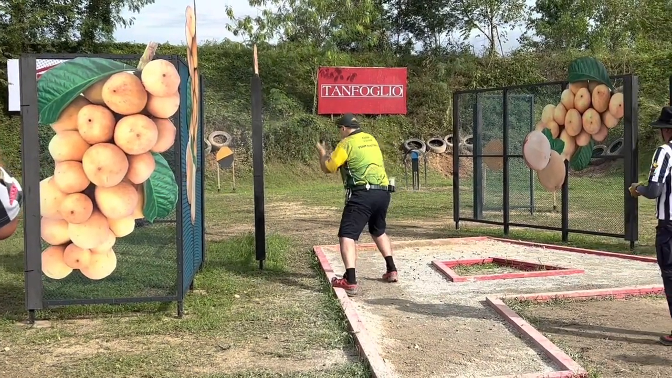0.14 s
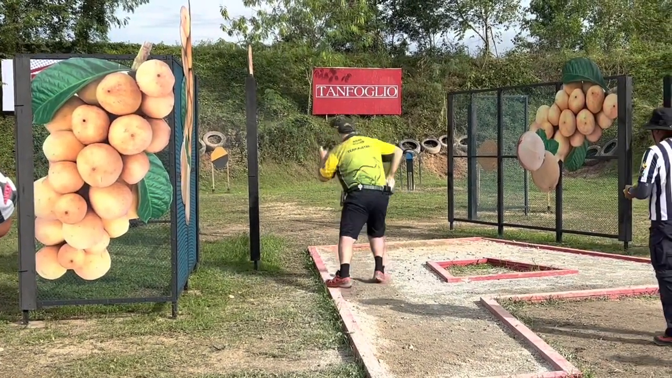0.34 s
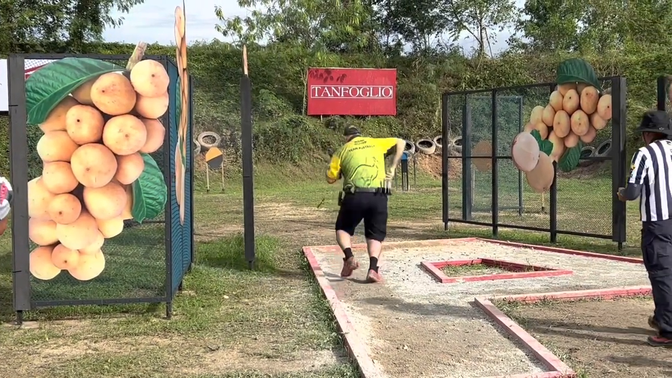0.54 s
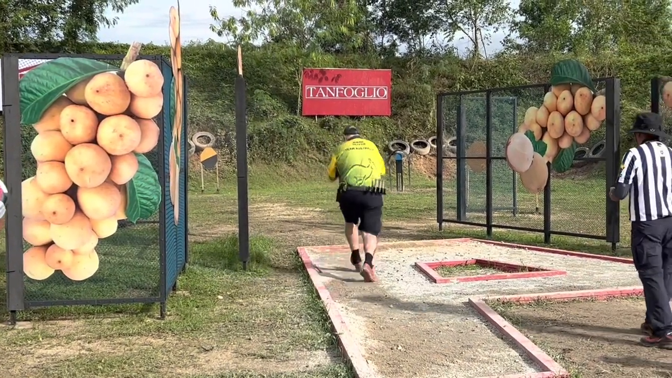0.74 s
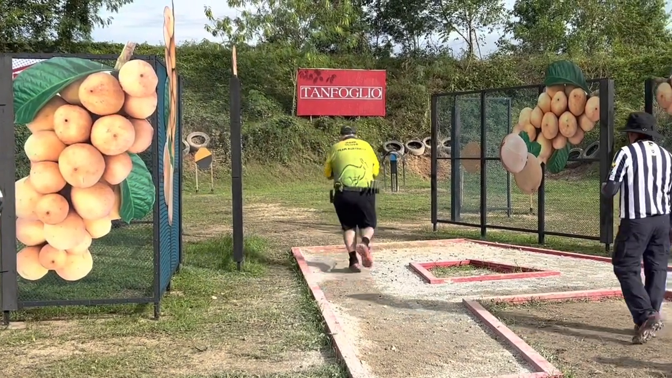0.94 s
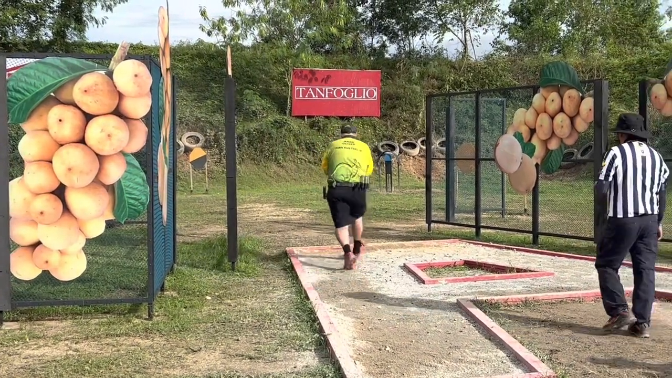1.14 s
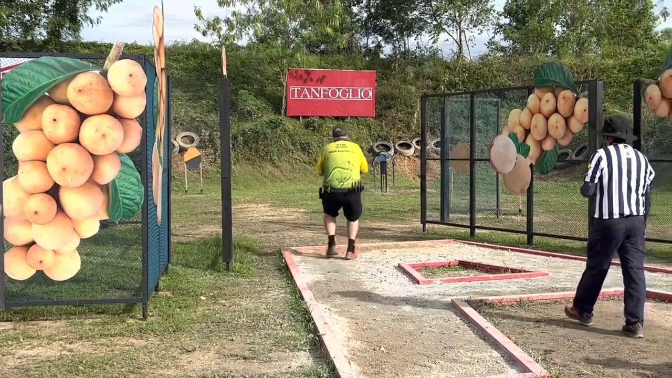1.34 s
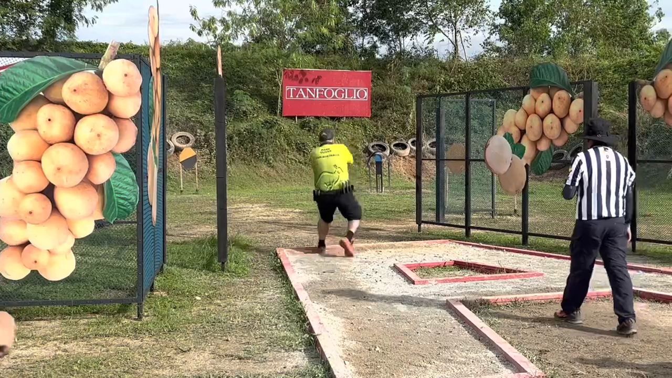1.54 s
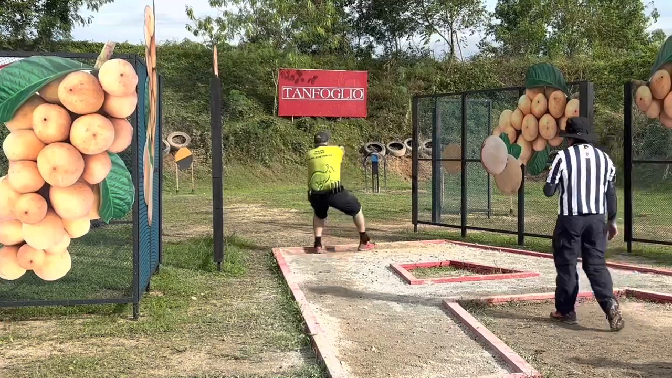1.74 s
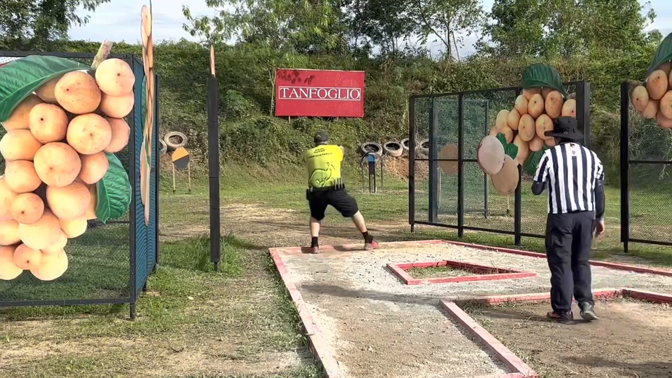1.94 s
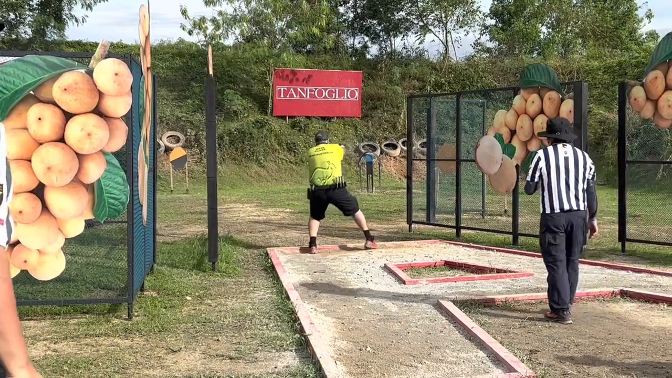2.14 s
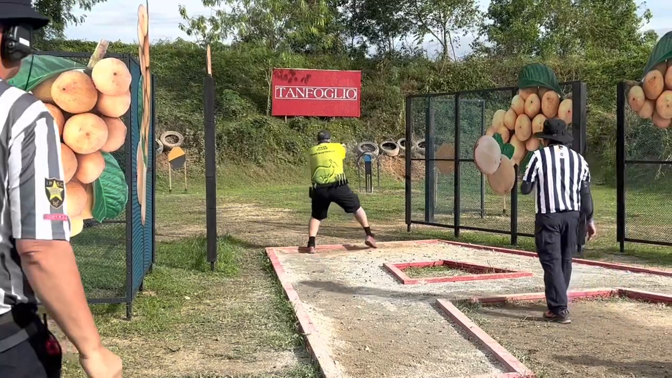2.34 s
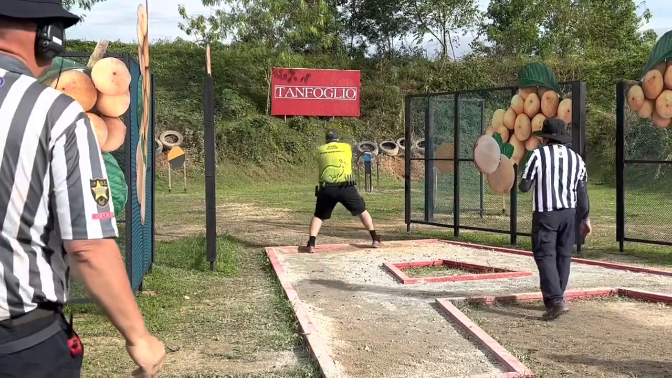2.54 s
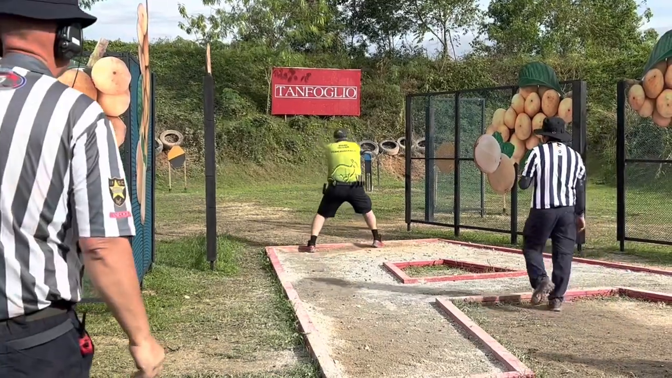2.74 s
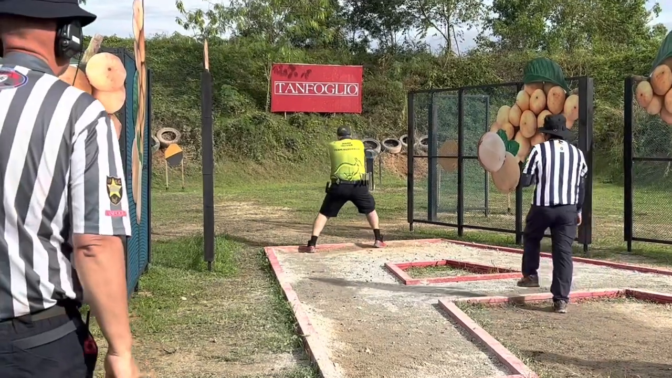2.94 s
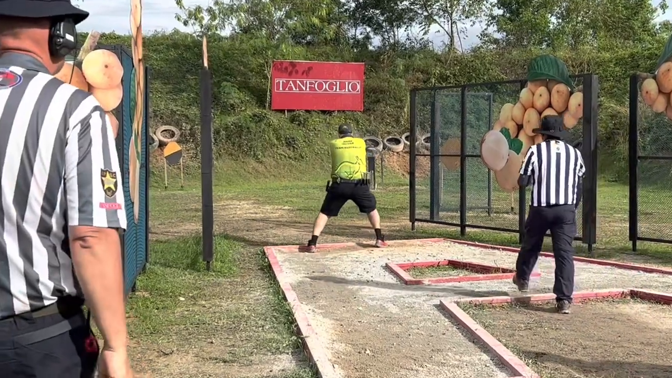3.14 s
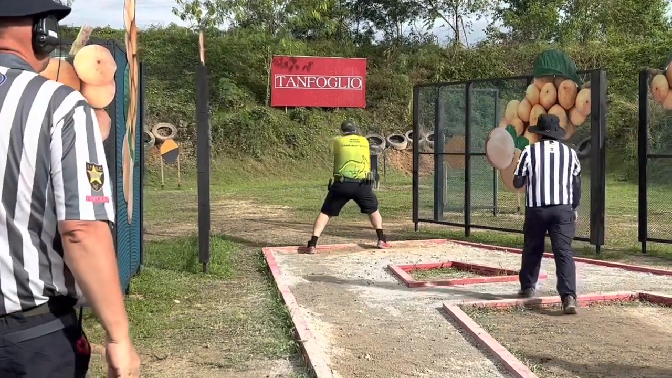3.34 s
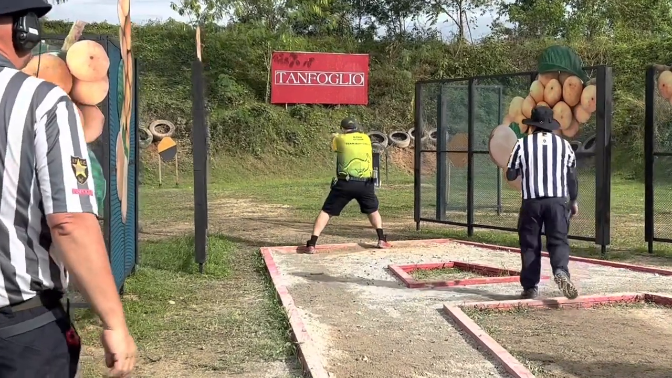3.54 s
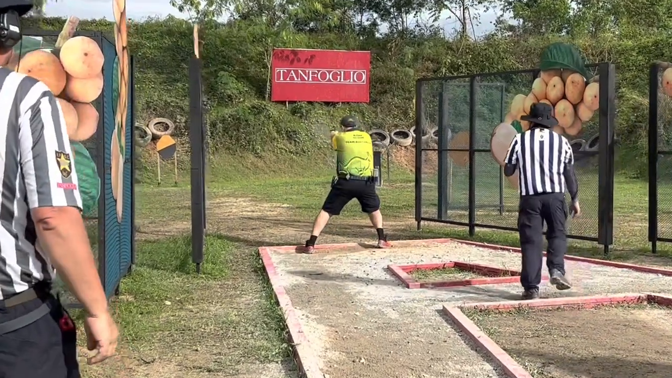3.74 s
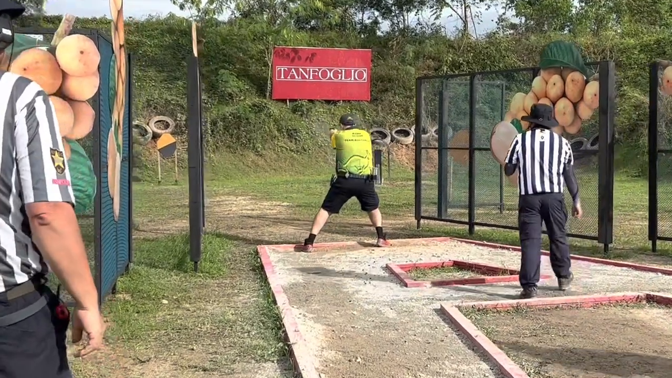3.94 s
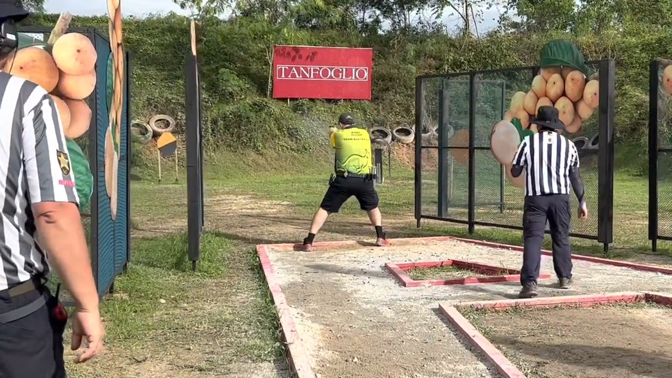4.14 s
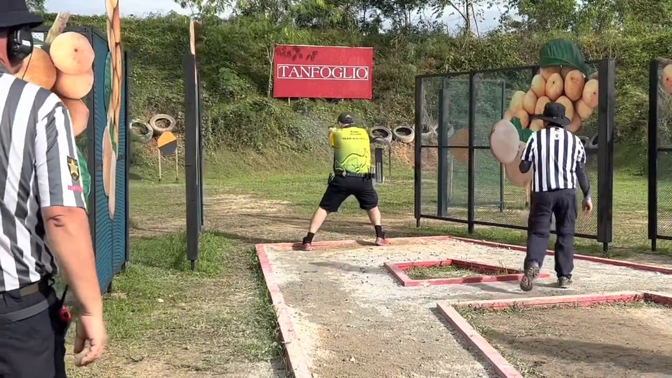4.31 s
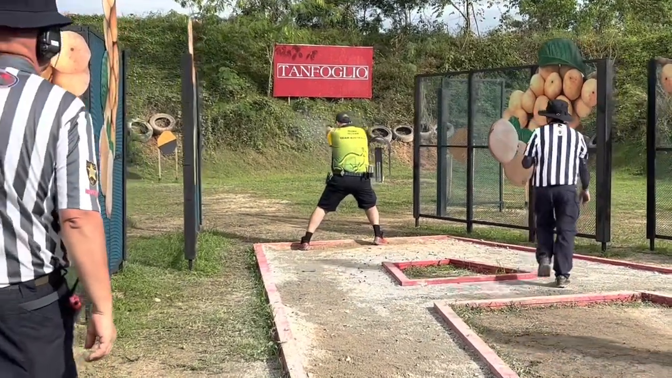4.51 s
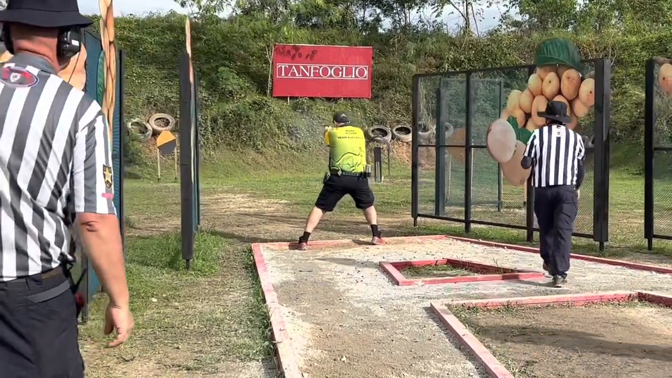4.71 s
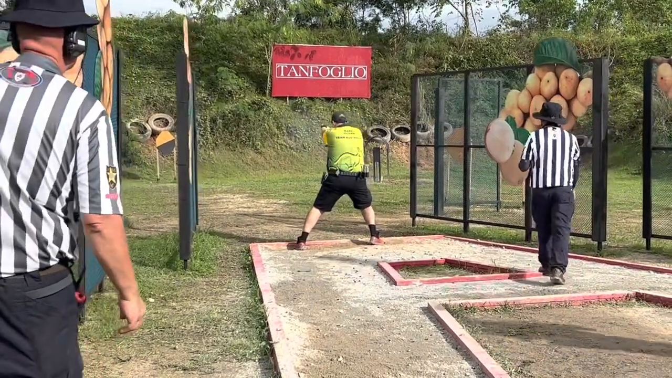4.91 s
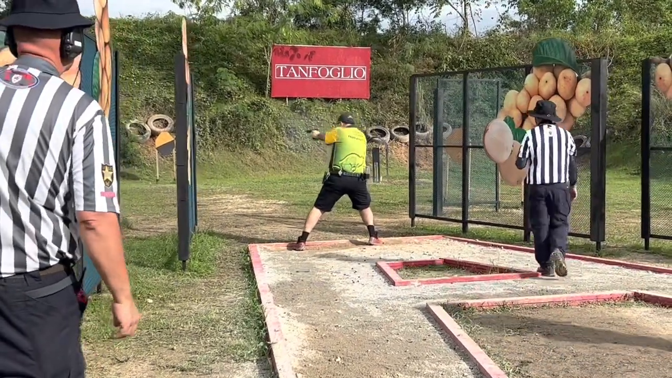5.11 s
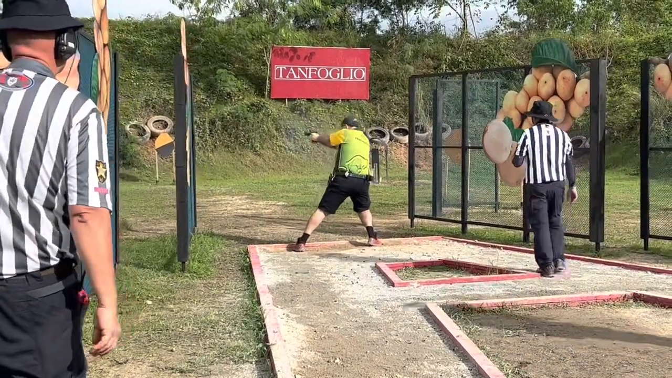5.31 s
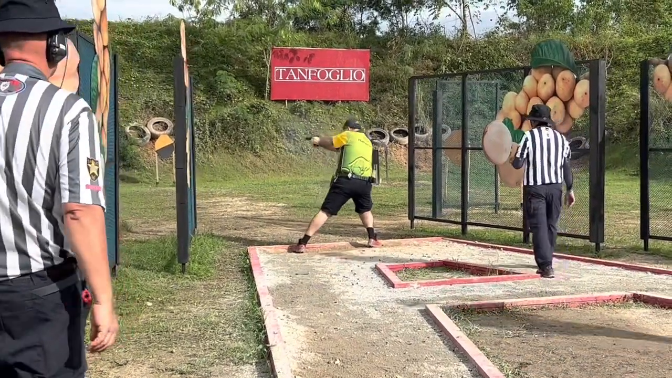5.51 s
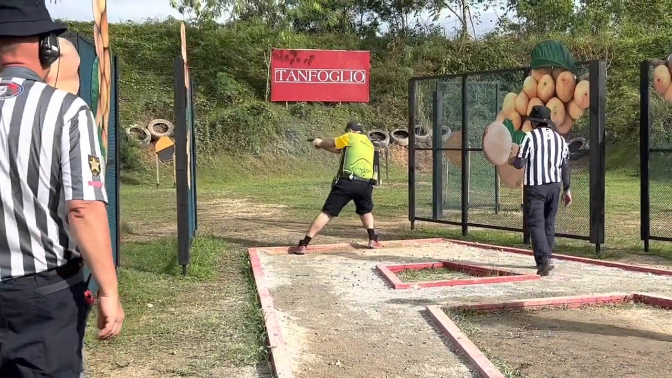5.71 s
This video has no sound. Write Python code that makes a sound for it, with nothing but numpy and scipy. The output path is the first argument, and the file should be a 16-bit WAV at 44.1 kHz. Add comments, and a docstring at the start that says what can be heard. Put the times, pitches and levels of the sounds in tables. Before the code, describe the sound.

Quiet outdoor air with a low, soft breeze; the far echo of an earlier shot fades during the first half second. From 0.2 to 2 s faint gravel crunches mark a running shooter, with a clear gear click at 0.76 s, smaller metallic clicks around 1.05 s, and duller footfalls and scuffs from 1.1 to 1.9 s. Then a pistol fires about ten metres away: a quick pair at 2.03 and 2.31 s, then single shots at 2.93, 3.66, 4.11, 4.54 and 5.60 s. Each is an abrupt, very loud crack with rapid slaps off ground, screen and bank, then a noisy wash from the trees and a dull roll fading within about half a second. Some carry a deep thump, strongest at the last. Tiny bullet strikes follow several shots by 30 to 80 milliseconds. At 3.0 s a bullet clanks on steel, ringing high and briefly; its low note faintly swells near 3.4 s.

```python
"""An outdoor bay with earth banks, where a pistol fires seven shots about ten metres from the microphones.
First a shooter runs over gravel: short noise bursts make crunches and footfalls, with clicking, ringing gear.
Each blast is a sharp front with a noisy wake; it slaps off the ground, screens and banks.
Noise that fades gives the trees' answer, and falling or wavering tones give the low thump and boom.
Bullets strike earth and targets; one rings a steel plate, built from fading tones, in the quiet outdoor air."""
import sys
import numpy as np
from scipy.fft import rfft, irfft, next_fast_len
from scipy.io import wavfile
from scipy.ndimage import map_coordinates

SR = 44100
rng = np.random.default_rng(int(sys.argv[2]) if len(sys.argv) > 2 else 0)


def wav_record(signal):
    """Record a signal, one row per channel, as 16-bit PCM in the file named by sys.argv[1]."""
    frames = np.transpose(np.atleast_2d(signal))
    bounded = np.clip(frames, -1, 1)
    # unit amplitude maps onto the largest positive 16-bit level
    quanta = np.round(bounded * 32767).astype(np.int16)
    wavfile.write(sys.argv[1], SR, quanta)


N = 258822
AGE = np.arange(SR) / SR  # seconds since one sound began
CLOCK = np.arange(N) / SR  # seconds since the scene began

# outdoor air: pitch_hz, level_db (per Hz, relative)
AIR_SPECTRUM = [(15, -54.5), (25, -21), (48, 1.5), (97, -1.5), (206, -10), (256, -14.5), (489, -17.5),
                (695, -19.5), (775, -20), (3340, -29.5), (6380, -35.5), (16000, -49)]
# two distant tree lines that echo: delay_s, level_db (relative), rise_s, fade_s (for 60 dB)
TREE_LINES = [(0.289, -0.5, 0.098, 0.96), (0.443, .5, 0.075, .55)]
# gear clicks: start_s, level_db, fade_s (for 60 dB), ring_db (ringing compared with rattle)
GEAR_CLICKS = [(.755, -39, 0.053, -19), (.772, -57, .11, 2.5), (.857, -63, 0.035, -10),
               (1.039, -57.5, 0.044, 3), (1.088, -47.5, .05, -9), (1.103, -54, 0.12, -17),
               (1.944, -61, 0.06, -30)]
# the gear's rattle: pitch_hz, level_db (per Hz, relative)
RATTLE_SPECTRUM = [(100, -6), (700, -8.5), (1900, -6), (3100, -3), (5000, -7.5), (7200, 4), (9500, -7.5),
                   (12000, -1.5), (16000, -13.5)]
# the gear's ringing tones: pitch_hz, level_db (relative, before a random change)
BUCKLE_TONES = [(2180, -4), (2340, 1), (2560, -4.5), (2950, -6), (3900, -5)]
# footfalls and scuffs: start_s, level_db (relative), bend_hz (treble falls above it), fade_s (for 60 dB)
FOOTFALLS = [(1.09, -61.5, 2400, 0.5), (1.284, -66, 1500, .09), (1.401, -63.5, 1980, .15),
             (1.44, -63.5, 1800, 0.21), (1.552, -55.5, 898, 0.18), (1.621, -62.5, 900, 0.19),
             (1.705, -55, 1080, 0.2), (1.739, -58, 1194, .1), (1.885, -60, 396.7, 0.59)]
# shots: start_s, blast_db, treble_db, thump_db, boom_db, screen_delay_s, screen_db, bank_db, far_db
# (all levels are relative)
SHOTS = [(2.0343, -0.5, 1.5, -11, 1, 0.019, -5.5, -15.5, -45),
         (2.3065, -1, 2.5, -17, -13, .0184, -2.5, -14, -52.5),
         (2.9310, -1.5, 0.5, -31, -28, 0.02, -3, -13.5, -57),
         (3.6558, -.5, 2, -3, -5, 0.018, -3.5, -6.5, -59),
         (4.1125, -1.5, 2, -1, -4, .0175, -2.5, -7.5, -59),
         (4.5355, .5, 2, -14, -19, .0176, -2.5, -9.5, -60), (5.6022, 0, -1.5, 3, -.5, 0.019, 2, -6, -59)]
# the muzzle blast: pitch_hz, level_db (per Hz, relative)
BLAST_SPECTRUM = [(40, -23), (150, -10), (300, -5), (520, -7.5), (750, -3), (1100, 0.5), (1300, -2.5),
                  (1550, -12), (2300, -9.5), (4300, -12), (5500, -18), (8000, -17.5), (12000, -19.5),
                  (16000, -31.5)]
# the trees' answer: pitch_hz, level_db (per Hz, relative)
SCATTER_SPECTRUM = [(30, -8.5), (100, -2.5), (200, 3.5), (500, -4.5), (800, -3), (1500, -11), (3000, -5),
                    (5500, -12), (8000, -9), (10000, -19.5), (12000, -16.5), (16000, -31)]
# bullets striking earth and targets: start_s, level_db (relative), brightest_hz
IMPACTS = [(2.0658, -11.5, 5004), (2.3374, -14, 4960), (4.1895, -14, 6480), (4.6123, -13.5, 6004),
           (5.6408, -22, 6000)]
# the steel plate's tones: pitch_hz, level_db, fade_s (for 60 dB)
PLATE_TONES = [(1137, -49, 1.2), (2592, -41.5, .6), (2760, -46, 0.43), (3300, -48, .35), (4380, -43, .35),
               (4895, -23.5, .12), (4900, -43, 0.66), (6770, -36.5, 0.2), (8300, -25.5, 0.11),
               (8335, -23, 0.058), (8350, -47, 0.52), (8730, -24.5, 0.079), (8700, -39.5, 0.41)]
# phase between the two microphones: pitch_hz, left_lead_radians
MICROPHONE_PHASE = [(300, .1), (1300, 0), (1600, -.6), (2100, 0), (3000, .65), (4500, .4), (6500, 0),
                    (8400, .1), (10280, -3.14), (12000, -6.28), (13800, -9.42), (15300, -12.4)]

# more colours, each: pitch_hz, level_db (relative)
FAR_SPECTRUM = [(25, -9), (48, 2.5), (75, -6.5), (150, 2.0), (450, -4.5), (1150, 2.0),
                (1800, -7.5), (3200, -7), (8000, -19), (13000, -34.0)]
GROUND_COLOUR = [(200, 7.5), (900, 1.5), (2000, 1.5), (8000, -12.0)]
SCREEN_COLOUR = [(300, 0.5), (1100, 0.5), (3000, -0.5), (8000, -3)]
SOFT_EARTH_SPECTRUM = [(100, -24.0), (300, -5), (430, -2.0), (620, -5.0), (1200, -21.0), (4000, -41.5)]
FENCE_COLOUR = [(300, 2.0), (1200, 0.5), (3000, 1), (8000, -10.5)]
LONG_PATH_COLOUR = [(200, 0.0), (1200, 8), (4000, -6.5), (8000, -4.5), (12000, -26)]
ROLL_SPECTRUM = [(60, -23.5), (160, -5.5), (310, -1.0), (540, -2.0), (800, -7), (1500, -16), (5000, -46)]
CLANK_SPECTRUM = [(200, -21.0), (1000, -11.5), (2000, 4.0), (3100, -1.0), (4300, -14.5),
                  (8000, -18), (16000, -25.5)]

# outdoor air: middle level, slow drift and quick flicker of that level
AIR_DB, AIR_DRIFT_DB, AIR_FLICKER_DB = -67, .8, 1.0
# an earlier shot's far echo is still dying away at the start
EARLIER_SHOT_AGO_S, EARLIER_ECHO_DB = .38, -61
# gravel crunches: the range runs from the quietest to the loudest
RUN_START_S, RUN_END_S = .2, 2.0
CRUNCH_QUIETEST_DB, CRUNCH_RANGE_DB, CRUNCH_T60_S, CRUNCH_BEND_HZ = -65.75, 5, .07, 1300
# echoes from fences and posts, right behind the blast
FENCE_DB, FENCE_ATTACK_S, FENCE_HOLD_S, FENCE_SAG_DB_PER_S, FENCE_T60_S = -21.5, .003, .031, 70, .06
# the trees' answer
TREES_DB, TREES_ATTACK_S, TREES_HOLD_S, TREES_SAG_DB_PER_S, TREES_T60_S = -31, .0055, .089, 23.5, .36
# the banks' low roll
ROLL_DB, ROLL_ATTACK_S, ROLL_HOLD_S, ROLL_T60_S = -35, .044, .061, .16
# both linger in a long, weak tail (dB compared with their own start)
TREES_TAIL_DB, ROLL_TAIL_DB, TAIL_T60_S = -14.5, -7.5, 1.01
# the low thump, before each shot's own level: a short swell whose pitch falls to rest
THUMP_DB, THUMP_PEAK_S, THUMP_WIDTH_S = -12, .021, .015
THUMP_START_HZ, THUMP_REST_HZ, THUMP_FALL_S = 210, 49.3, .012
THUMP_ECHO_S, THUMP_ECHO_DB = .028, -20.5
# the bass boom, before each shot's own level: a slow swell on one wavering note
BOOM_DB, BOOM_HZ, BOOM_PEAK_S, BOOM_WIDTH_S = -32, 49.5, .155, .082
# the bullet on the plate, and a later swell of the plate's lowest note
PLATE_S = 2.9988
SWELL_S, SWELL_DB, SWELL_RISE_S, SWELL_T60_S = 3.42, -46, .16, .18
# soft overload ceiling (full scale is 1) and upper limit of the sound
OVERLOAD_LEVEL, TOP_HZ = .64, 15900


def amp(db):
    """Turn decibels into a multiplier."""
    return 10 ** (np.asarray(db) / 20)


def unit(x):
    """Scale to an average strength (rms) of 1."""
    return x / np.sqrt(np.mean(x ** 2) + 1e-20)


def add(track, s, x):
    """Mix x into the track at time s, which may lie before the start."""
    start = round(s * SR)
    x = x[..., max(-start, 0):]
    part = track[..., max(start, 0):][..., :x.shape[-1]]
    part += x[..., :part.shape[-1]]


def colour(x, points):
    """Filter by (Hz, dB) points without any sound before its cause (minimum phase)."""
    n = x.shape[-1]
    m = 2 * next_fast_len(n // 2 + 4096)
    hz, db = np.transpose(points)
    gain_db = np.interp(np.log(np.fft.rfftfreq(m, 1 / SR) + 1), np.log(hz), db)
    # folding the cepstrum forward in time gives the matching phase
    cepstrum = irfft(np.log(amp(gain_db)))
    cepstrum[1:m // 2] *= 2
    cepstrum[m // 2 + 1:] = 0
    return irfft(rfft(x, m) * np.exp(rfft(cepstrum)), m)[..., :n]


def wobble(rate, size=SR):
    """A smooth random curve through `rate` random points a second."""
    points = rng.standard_normal(int(size * rate / SR) + 4)
    return map_coordinates(points, [np.arange(size) * rate / SR])


def wash(spectrum, side_db, size=SR):
    """Coloured stereo noise of rms 1; side_db sets how much the two ears differ."""
    mid, side = colour(rng.standard_normal((2, size)), spectrum)
    side = amp(side_db) * side
    return unit(np.array([mid + side, mid - side]))


def hump(hz, below_db, above_db):
    """A broad colour around hz, with its levels two octaves below and above."""
    return [(hz / 16, 2 * below_db), (hz / 4, below_db), (hz, 0), (hz * 4, above_db)]


def envelope(attack_s, hold_s, t60, sag_db_per_s=0):
    """A rise, a hold that may sag, then an even decay."""
    held = np.clip(AGE - attack_s, 0, hold_s)
    released = np.maximum(AGE - attack_s - hold_s, 0)
    rise = np.minimum(AGE / attack_s, 1) ** 2
    return rise * amp(-sag_db_per_s * held - 60 * released / t60)


def with_tail(shape, tail_db):
    """Add a long, weak decay under an envelope."""
    tail = amp(tail_db - 60 * AGE / TAIL_T60_S) * np.maximum.accumulate(shape)
    return np.hypot(shape, tail)


def swell(peak_s, width_s):
    """A rounded rise and fall that reaches 1 at peak_s."""
    return np.exp(-((AGE - peak_s) / width_s) ** 2)


def crest(t, rise_s, t60):
    """Grow by 20 dB in rise_s up to t = 0, then decay."""
    return amp(np.minimum(20 * t / rise_s, -60 * t / t60))


def tap(sound, t60, rise_s):
    """A gritty contact that fades fast, with a faint, slower answer from the bay."""
    contact = amp(-60 * AGE / t60)
    answer = amp(-26.0 - 60 * AGE / 1.1)
    rise = 1 - np.exp(-AGE / rise_s)
    grit = unit(amp(3 * wobble(300)))
    return grit * (contact + answer) * rise * sound


def breeze():
    """Quiet outdoor air: noise whose level drifts slowly and flickers quickly."""
    drift_db = AIR_DRIFT_DB * wobble(1.1, size=N)
    flicker_db = AIR_FLICKER_DB * wobble(29, size=N)
    return amp(AIR_DB + drift_db + flicker_db) * wash(AIR_SPECTRUM, side_db=-12, size=N)


def far_echo():
    """Two distant tree lines answer: noise that swells to two crests within half a second."""
    power = sum((amp(db) * crest(AGE - delay_s, rise_s, t60)) ** 2
                for delay_s, db, rise_s, t60 in TREE_LINES)
    return np.sqrt(power) * amp(1.5 * wobble(40)) * wash(FAR_SPECTRUM, side_db=-7.5)


def earlier_shot():
    """The dying far echo of a shot fired before the start."""
    out = np.zeros((2, N))
    add(out, -EARLIER_SHOT_AGO_S, amp(EARLIER_ECHO_DB) * far_echo())
    return out


def crunches(count):
    """Loose gravel shifts in short noise bursts at uneven intervals under the running shooter."""
    out = np.zeros((2, N))
    spectrum = hump(CRUNCH_BEND_HZ, below_db=0, above_db=-20.5) + [(16000, -41)]
    for k, (late, size) in enumerate(rng.random((count, 2))):
        gravel = tap(wash(spectrum, side_db=-9), CRUNCH_T60_S, rise_s=.002)
        s = RUN_START_S + (k + late) / count * (RUN_END_S - RUN_START_S)
        add(out, s, amp(CRUNCH_QUIETEST_DB + CRUNCH_RANGE_DB * size) * gravel)
    return out


def gear():
    """The shooter's gear clicks: a noisy rattle mixed with wavering metal tones."""
    out = np.zeros((2, N))
    for s, db, t60, ring_db in GEAR_CLICKS:
        ring = np.zeros(SR)
        for hz, level_db in BUCKLE_TONES:
            tone = np.sin(2 * np.pi * hz * AGE + wobble(150))
            ring += amp(level_db + rng.normal(0, 3.9)) * tone
        click = wash(RATTLE_SPECTRUM, side_db=-18.5) + amp(ring_db) * unit(ring)
        add(out, s, amp(db) * tap(click, t60, rise_s=.00088))
    return out


def footfalls():
    """Shoes land and scuff on gravel: gritty noise with a softer start than the clicks."""
    out = np.zeros((2, N))
    for s, db, hz, t60 in FOOTFALLS:
        gravel = wash(hump(hz, below_db=2.0, above_db=-17) + [(16000, -33)], side_db=-9.5)
        add(out, s, amp(db + 4.0) * tap(gravel, t60, rise_s=.013))
    return out


def crack(spectrum, spread_s, ragged, side_db=-11):
    """A pressure front with a ragged wake that differs at each microphone."""
    u = AGE / spread_s
    wake = rng.standard_normal((2, SR)) * u * np.exp(-u ** 2 / 4)
    mid = ragged * unit(wake[0])
    side = ragged * amp(side_db) * unit(wake[1])
    add(mid, spread_s, np.array([np.sqrt(SR)]))  # the front is a single spike
    # as strong as one millisecond at rms 1
    return unit(colour(np.array([mid + side, mid - side]), spectrum)) / np.sqrt(1000)


def wall_slap(direct):
    """An uneven wall mirrors part of the wave and scrambles the rest."""
    scrambled = crack(BLAST_SPECTRUM, spread_s=.00071, ragged=3.0, side_db=-15.0)
    return amp(-3) * direct + amp(-5.5) * scrambled


def bank_slap():
    """The earth bank returns a crack, and its soft earth a low note a moment later."""
    bank = crack(hump(3200, below_db=-2, above_db=-16), spread_s=.00091, ragged=4.5)
    earth = crack(SOFT_EARTH_SPECTRUM, spread_s=.00072, ragged=.58)
    add(bank, .0018, amp(2.5) * earth)
    return bank


def blast(screen_s, screen_db, bank_db):
    """The muzzle blast, its slaps off ground, screen and bank, and echoes from fences and posts."""
    direct = crack(BLAST_SPECTRUM, spread_s=.0007, ragged=1.9, side_db=-17)
    ground = colour(wall_slap(direct), GROUND_COLOUR)
    screen = colour(wall_slap(direct), SCREEN_COLOUR)
    fence_shape = envelope(FENCE_ATTACK_S, FENCE_HOLD_S, FENCE_T60_S, FENCE_SAG_DB_PER_S)
    fence_noise = colour(wash(BLAST_SPECTRUM, side_db=-11.0), FENCE_COLOUR)
    out = direct + amp(FENCE_DB + 2 * wobble(500)) * fence_shape * fence_noise
    add(out, .0058, amp(-4.5) * ground)
    add(out, screen_s, amp(screen_db) * screen)
    add(out, .0538, amp(bank_db - 6.0) * bank_slap())
    return out


def thump(thump_db, boom_db):
    """The jolted microphones: a short push, a heave falling in pitch with one echo, then the bay's boom."""
    push = np.cos(2 * np.pi * 205 * (AGE - .009)) * swell(peak_s=.007, width_s=.004)
    push_gain = amp(-14.0 + 0.11 * thump_db)  # the push grows much less than the heave
    hz = THUMP_REST_HZ + (THUMP_START_HZ - THUMP_REST_HZ) * np.exp(-(AGE / THUMP_FALL_S) ** 2)
    heave_tone = np.sin(2 * np.pi * np.cumsum(hz) / SR + 3.2)
    heave = amp(THUMP_DB) * swell(THUMP_PEAK_S, THUMP_WIDTH_S) * heave_tone
    add(heave, THUMP_ECHO_S, amp(THUMP_ECHO_DB) * heave)
    boom_tone = np.sin(2 * np.pi * BOOM_HZ * AGE + .45 * wobble(22))
    boom = amp(BOOM_DB) * swell(BOOM_PEAK_S, BOOM_WIDTH_S) * boom_tone
    low = push_gain * push + amp(thump_db) * heave + amp(boom_db) * boom
    return low * amp([[.5], [-.5]])  # slightly stronger on the left


def trees():
    """Countless small echoes from grass, banks and leaves; longer paths lose their treble."""
    early = wash(SCATTER_SPECTRUM, side_db=-16)
    late = colour(early, LONG_PATH_COLOUR)
    late_share = np.clip(AGE / 0.8, 0, 1) ** 2.5
    clumps_db = 1.8 * wobble(350) + 1.5 * wobble(60)
    shape = envelope(TREES_ATTACK_S, TREES_HOLD_S, TREES_T60_S, TREES_SAG_DB_PER_S)
    noise = early * (1 - late_share) + late * late_share
    return noise * amp(TREES_DB + clumps_db) * with_tail(shape, TREES_TAIL_DB)


def bank_roll():
    """The banks' low roll: dull, wide noise in uneven lumps."""
    lumps = unit(amp(4.5 * wobble(110)))
    shape = with_tail(envelope(ROLL_ATTACK_S, ROLL_HOLD_S, ROLL_T60_S), ROLL_TAIL_DB)
    return amp(ROLL_DB) * wash(ROLL_SPECTRUM, side_db=-3) * lumps * shape


def pistol():
    """Every shot with its thump and echoes, brighter or duller as the muzzle turns."""
    out = np.zeros((2, N))
    for s, blast_db, treble_db, thump_db, boom_db, screen_s, screen_db, bank_db, far_db in SHOTS:
        bang = colour(blast(screen_s, screen_db, bank_db), [(1200, 0), (2200, treble_db)])
        add(out, s, amp(blast_db - 3.0) * bang)
        add(out, s, thump(thump_db, boom_db))
        add(out, s, trees() + bank_roll() + amp(far_db) * far_echo())
    return out


def impacts():
    """Bullets strike earth and targets: small cracks, each with its own brightest pitch."""
    out = np.zeros((2, N))
    for s, db, hz in IMPACTS:
        strike = crack(hump(hz, below_db=-14.5, above_db=-15.5), spread_s=.00059, ragged=2.5)
        add(out, s, amp(db - 6.0) * strike)
    return out


def plate():
    """A bullet clanks on steel, with a splash of noise; the tones beat and waver as the plate tips."""
    out = np.zeros((2, N))
    clank = crack(CLANK_SPECTRUM, spread_s=.0003, ragged=.73)
    ring = np.zeros(SR)
    for hz, db, t60 in PLATE_TONES:
        level_db = db - 60 * AGE / t60 + 2.6 * wobble(25)
        ring += amp(level_db) * np.sin(2 * np.pi * hz * AGE + .4 * wobble(80))
    splash_noise = wash(hump(3500, below_db=-7, above_db=-13.0), side_db=-13.0)
    splash = amp(-36.5 - 60 * AGE / 0.33) * splash_noise
    add(out, PLATE_S, amp(-9.5) * clank + ring + splash)
    return out


def plate_swell():
    """The plate's lowest note swells once more and fades fast."""
    lowest_hz = PLATE_TONES[0][0]
    low_note = np.sin(2 * np.pi * lowest_hz * CLOCK + .3 * wobble(50, size=N))
    return amp(SWELL_DB) * crest(CLOCK - SWELL_S, SWELL_RISE_S, SWELL_T60_S) * low_note


def scene():
    """The whole bay."""
    before_firing = breeze() + earlier_shot() + crunches(count=14) + gear() + footfalls()
    return before_firing + pistol() + impacts() + plate() + plate_swell()


def record(dry):
    """The microphones overload softly and differ in phase; the highest treble is cut off."""
    squashed = dry / (1 + np.abs(dry / OVERLOAD_LEVEL) ** 4) ** (1 / 4)
    m = next_fast_len(N + SR // 2)
    hz = np.fft.rfftfreq(m, 1 / SR)
    phase = np.interp(hz, *np.transpose(MICROPHONE_PHASE))
    turn = np.exp(.5j * np.outer([1, -1], phase))  # half the lead on each side
    band = 1 / np.sqrt(1 + (hz / TOP_HZ) ** 140)
    return irfft(rfft(squashed, m) * turn * band, m)[:, :N]


dry = scene()
out = record(dry)
wav_record(out)
```